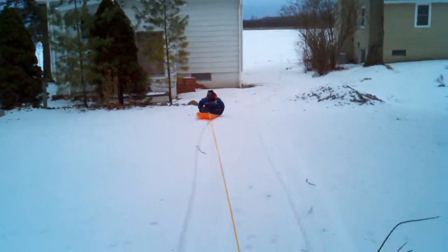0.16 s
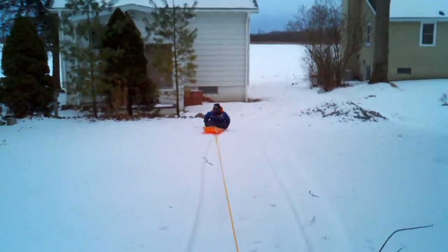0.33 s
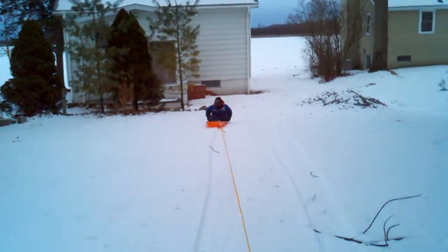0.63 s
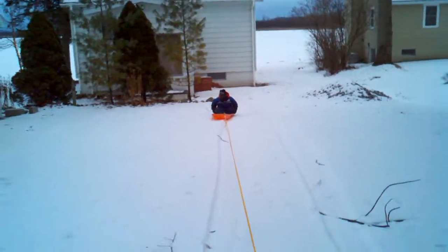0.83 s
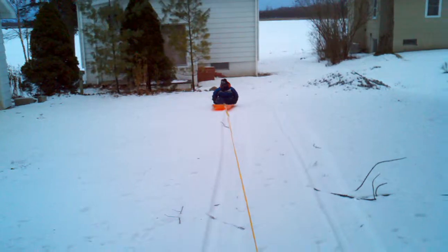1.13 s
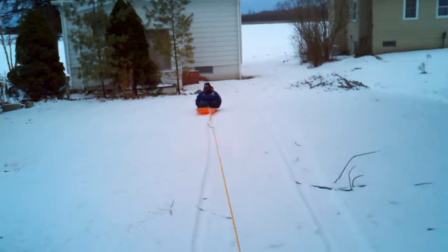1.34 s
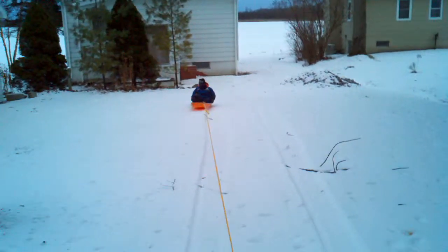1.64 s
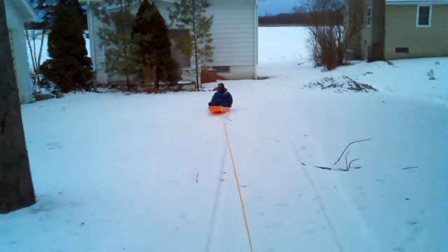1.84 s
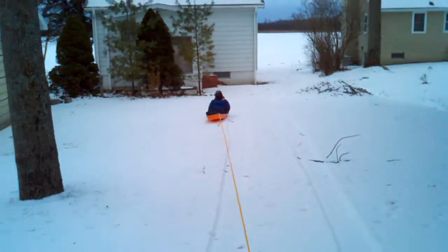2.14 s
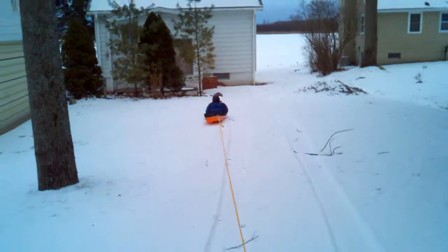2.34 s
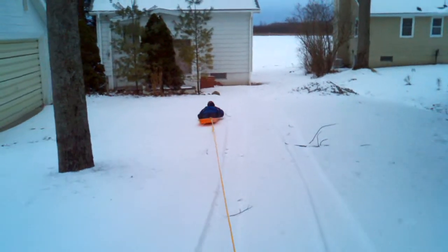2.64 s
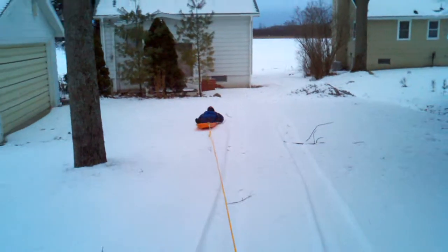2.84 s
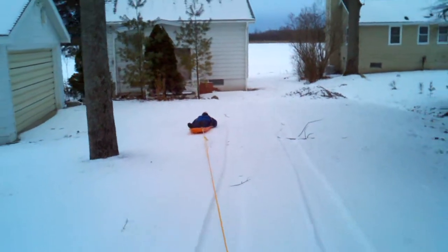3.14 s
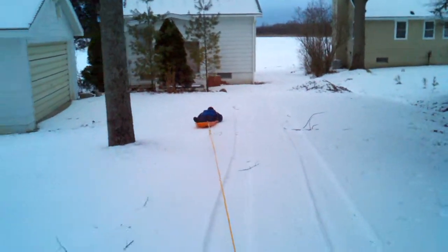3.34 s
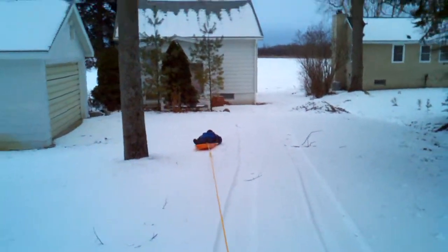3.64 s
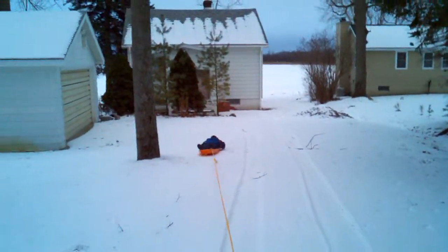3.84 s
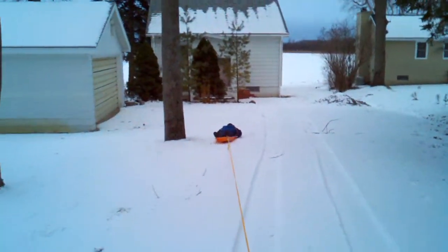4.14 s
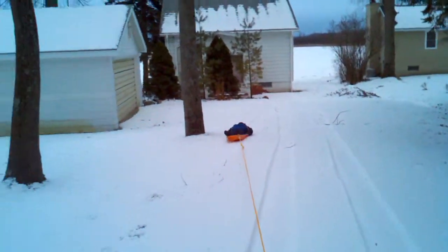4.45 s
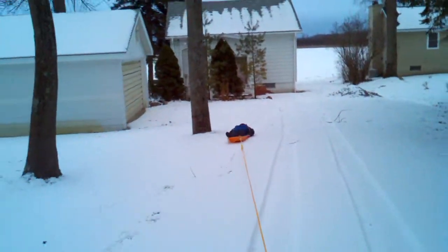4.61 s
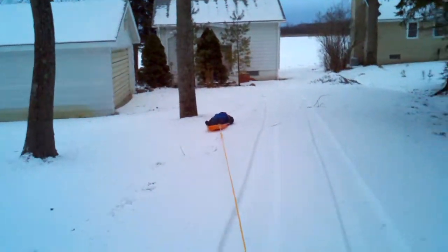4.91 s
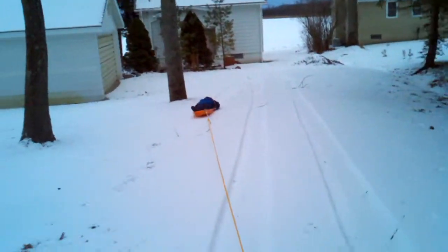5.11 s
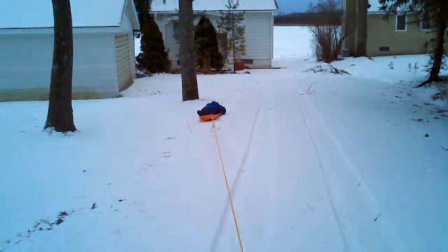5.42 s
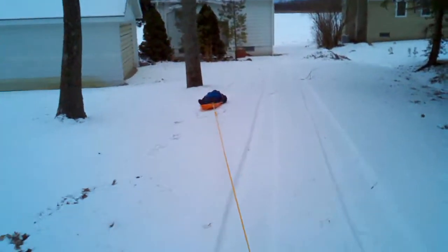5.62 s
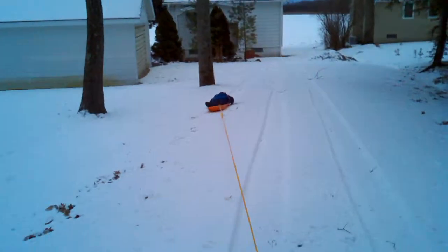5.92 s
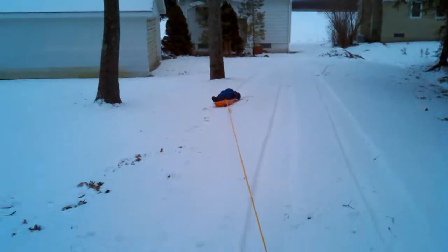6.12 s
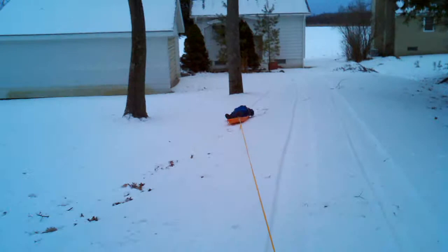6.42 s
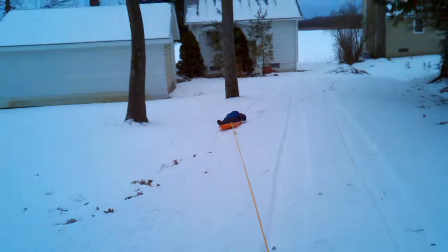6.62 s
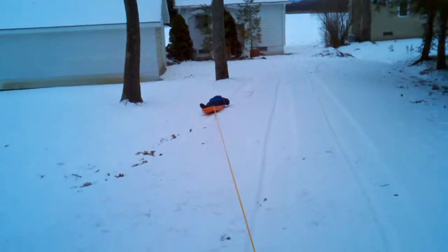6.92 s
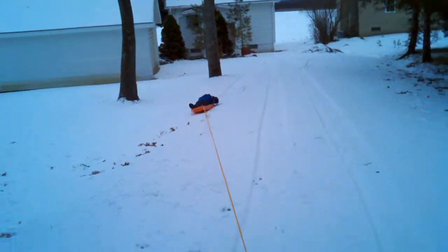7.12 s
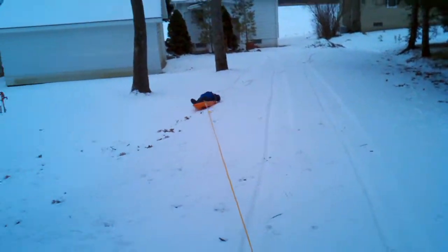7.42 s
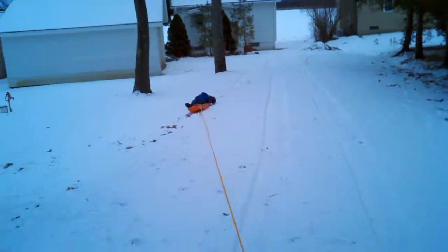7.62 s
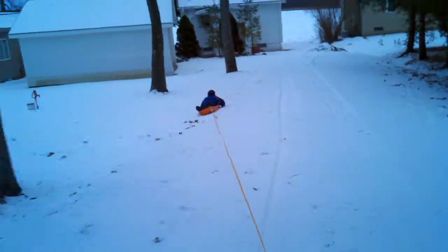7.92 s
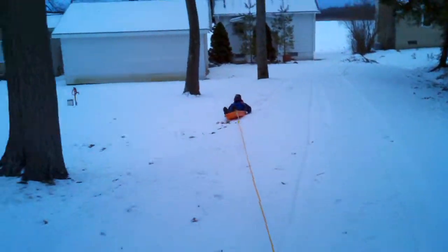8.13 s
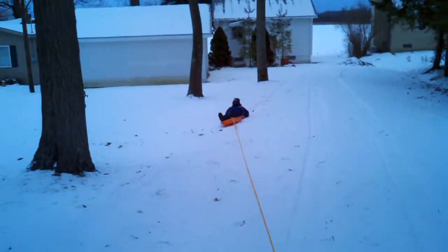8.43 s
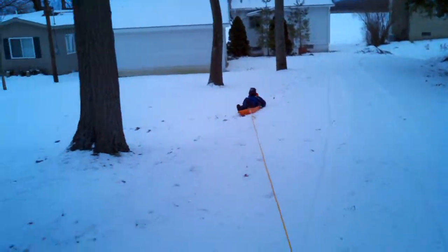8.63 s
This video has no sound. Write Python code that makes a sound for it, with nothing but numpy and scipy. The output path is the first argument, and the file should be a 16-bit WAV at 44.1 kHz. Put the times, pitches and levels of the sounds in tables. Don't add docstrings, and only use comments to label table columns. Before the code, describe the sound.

A nearby one-cylinder engine chugs with a hollow, buzzy exhaust, pulling a sled across a snowy yard. Its pitch drops briefly, climbs quickly, sinks again and then wavers gently. Mechanical clatter keeps step with the firings over a bright snowy hiss. Early bumps rattle the cart, and low gusts flap at the wide stereo microphone until about five seconds, when the air calms.

```python
import sys
import numpy as np
from scipy import signal
from scipy.fft import rfft, irfft, next_fast_len
from scipy.io import wavfile

SR = 44100
rng = np.random.default_rng(int(sys.argv[2]) if len(sys.argv) > 2 else 0)


def log_audio(samples):
    frames = np.atleast_2d(samples).T
    limited = np.clip(frames, -1, 1)
    pcm = np.round(limited * 32767).astype(np.int16)
    wavfile.write(sys.argv[1], SR, pcm)


N = 386316

# (t/s, rate/firings per s)
ENGINE_SPEED = [(0.0, 15.929), (0.432, 14.538), (0.635, 15.398), (1.59, 23.177), (1.972, 24.6),
                (2.322, 24.961), (2.732, 24.18), (3.71, 20.553), (4.703, 19.519), (5.046, 19.748),
                (5.223, 19.282), (5.504, 20.067), (5.786, 20.082), (5.922, 20.883), (6.645, 21.954),
                (7.12, 21.979), (8.034, 19.877), (8.76, 20.446)]
# (t/s, throttle/dB, snow/dB)
LOAD = [(0, -1.5, -2.5), (.3, 0, 1), (.75, -0.5, -2.5), (1.0, 2, 0), (1.5, 1, 0), (1.8, -2, 2.5),
        (2.4, -1.5, 0.5), (3.3, -2.5, -1.5), (3.5, 0, -0.5), (4.3, -0.5, 0.2), (5.2, 2, 0.5),
        (6.0, -0.5, -1.5), (6.8, 1, -0.2), (7.4, 1, -0.5), (8.0, 0, 0.1), (8.25, -0.5, 0), (8.76, 0, -0.5)]
# (t/s, spread/s, lag/hundredths of a cycle)
TUGS = [(.35, .28, -2.3), (.85, .08, 2), (1.29, .1, .8), (1.86, .3, .55), (2.74, .1, -2.21),
        (2.8, .16, 2.37), (3.07, .08, 1.88), (3.16, .25, -1.48), (3.68, .12, .5), (3.99, .08, -.97),
        (4.37, .09, .89), (5.13, .05, -.5), (5.33, .05, -.3), (5.45, .05, .3), (6.11, .06, -1.42),
        (6.31, .06, .55), (6.55, .1, -.44), (6.82, .08, -1.09), (7.29, .09, -2.59), (7.69, .3, 2.36),
        (7.73, .17, -3.07), (8.11, .06, -1.69), (8.39, .09, 1.54), (8.55, .18, -1.59)]
# (t/s, rattle/dB, crunch/dB)
BURSTS = [(0.02, 6, 1), (0.378, 5.5, 4.5), (0.44, 3, 5.5), (0.465, -2, -1), (0.515, -1.5, 1),
          (0.582, -1.5, 3), (0.65, -2, 6), (0.71, -1.5, 5), (0.775, 0, 2.5), (0.83, 2, 3), (0.89, 3, 3.5),
          (0.95, 3.5, 3), (1.0, 3.5, 3.5), (1.05, -0.5, 1.5), (1.11, -1.5, 3), (1.19, -1, 6),
          (1.67, 0.5, 0.5), (1.76, -0.5, 4.5), (2.04, 2, 0), (5.73, 1.5, 4.5), (7.3, 2, -2), (8.24, -1, 2)]
# (t/s, half length/s, peak/dB)
GUSTS = [(0.023, 0.15, -36), (0.5, 0.11, -27.5), (0.687, 0.061, -38), (0.998, 0.11, -33.5),
         (1.117, 0.11, -30), (1.82, 0.079, -29), (2.3, .12, -33), (2.553, 0.1, -33), (2.8, .1, -35),
         (3.0, 0.1, -29), (3.278, 0.2, -30.5), (3.486, .12, -29.5), (3.693, .1, -31), (3.898, .08, -34),
         (4.2, .08, -36), (4.5, 0.34, -35.5), (7.95, .15, -57)]
# (t/s, peak/dB, left-right/dB)
BUFFETS = [(0.043, -10, -3), (0.152, -19, 6), (0.459, -15, -13.5), (0.49, -24, -4), (0.507, -22, -3),
           (0.545, -12, -1), (0.694, -21, -6), (1.128, -20, 4), (1.355, -14.5, 16.5), (1.744, -13, 2),
           (1.813, -13, -1), (1.865, -18.5, -18), (1.885, -24, 9), (2.36, -12.5, 9), (2.517, -9, -8),
           (2.563, -14.5, -15), (2.587, -12, -9), (2.838, -24, -3), (2.899, -18, 6), (3.016, -7, -3),
           (3.189, -25, -12), (3.314, -17, -6), (3.441, -9.5, 8), (3.467, -14, -5), (3.661, -20, 4),
           (4.018, -15, 1), (4.16, -19, 7), (4.55, -22, 2), (4.584, -15, -4), (4.742, -24, -8)]
# (f/Hz, level/dB per Hz, left-right likeness, left-right/dB,
# throb/dB, loudest at/share of cycle)
HISS = [(3650, -17, 0.47, 0, .3, 0.82), (5200, -2, 0.59, 0.38, 0.26, 0.97), (6260, -1, 0.092, 0, 1.3, 0.99),
        (7820, 7, 0.091, 0, 0.65, 0.63), (9140, 0.5, 0.12, 1.1, 0.59, 0.89), (11140, 1, 0.06, 0, 1.3, 0.71),
        (12600, -5.5, 0.092, 0, 1.2, .75), (14150, 4.5, 0.11, 0, 1.2, .75)]
CLATTER = [(21.75, -43, -.5, -5, -3, .1), (59.6, -35, 0.64, 0, 5, .1), (113.9, -15, 0.91, -2, 8.5, 0.81),
           (211, -8, 0.98, 3.5, 1.5, 0.95), (279, -15, 1, 0.5, 1, 0.95), (420, -8, 0.81, 1.5, 2, .95),
           (704, -21, 0.64, 0.5, 3, 0.82), (1303, -27.5, 0.26, -1.5, 0.7, 0.73),
           (2015, -28, -0.27, 0.5, 2, 0.75), (2807, -48.5, -2.2, 18.5, 0.5, 0.49),
           (3338, -31, 0.3, -18, 1.5, 0.86), (4920, -61.5, 0.72, 2, -4, 0.5)]
# (f/Hz, width/Hz, level/dB, throb/dB, loudest at/share of cycle)
RINGS = [(2975, 190, -66, 0.5, 0.63), (3010, 41, -103, -14, 0.61), (2100, 460, -58, 1.5, 0.32),
         (10230, 810, -57.5, 3, 0.8)]
# (t/s, peak/dB)
KNOCKS = [(.458, -17), (1.453, -20), (2.555, -22), (2.585, -19), (3.015, -21), (3.442, -21), (3.465, -26),
          (4.617, -27), (6.77, -24), (7.18, -25), (7.31, -23)]
# (f/Hz, time to fall 60 dB/s, level/dB)
HITCH_TONES = [(330, .04, 0), (410, .035, -1), (490, .03, -3)]
# (engine order, level/dB)
GEARS = [(28, -52), (30, -55), (32, -53), (34, -58), (36, -55), (38, -55), (40, -57)]
# (f/Hz, time to fall 60 dB/s, left/dB, right/dB)
PANELS = [(554, 0.032, -20, -12), (667, 0.03, 9, 15.5), (807, 0.043, 18, 0), (897, 0.14, -15, 9)]
# (engine order, level/dB)
PULSE = [(4, -9), (5, -7), (6, 7.5), (8, .5), (9, 7.5), (10, 5), (11, -8.5), (12, 0.3)]
# (f/Hz, width/Hz, signed strength of exhaust pulse, of intake pulse)
PIPE = [(100.89, 17.8, 19, 25), (166.7, 44, 6, 7.5), (185.8, 13.7, -8.5, -19.5), (218.9, 18.9, -6.5, -13),
        (240.3, 16, -12.5, 2), (335.4, 20, 12.5, 7.15), (415.6, 15.95, -1.5, -5), (435.07, 34.4, -8, -2),
        (479.7, 28.4, -3.5, -7), (509.38, 40, 1.1, 4.5), (684, 51, -2, -0.5), (702, 104, 1.1, -0.76),
        (920, 15, 0.9, -0.3), (1110, 110, -0.6, 0.84)]
# (f/Hz, left-right/dB, left leads by/radians)
PORTS = [(80, 0.5, 0.6), (124, 0, 0.24), (164, 3, 0.54), (194, 4.5, 0.8), (214, 3.5, 0.2), (281, -16.5, 2),
         (317, 0, 0.52), (503, -1.5, -0.4)]
# (f/Hz, share of the other side taken off)
WIDEN = [(30, 0.35), (250, 0.21), (850, 0.37), (1200, .97), (2600, .95), (4000, .97), (5200, .7),
         (6500, 0.42), (14000, 0.38)]

CYCLE_AT_START = .93
MEAN_RATE = 21
CURVE_STEP = 64
EXHAUST_DB, EXHAUST_DB_PER_RATE, BARK_DB_PER_OCTAVE = -58.5, 0.58, 2.0
CLATTER_DB, CLATTER_DB_PER_RATE, CLATTER_FOLLOWS = -39.5, 0.68, 0.37
HISS_DB, RING_DB, RING_FOLLOWS, GEAR_DB_PER_RATE = -53.5, 3, 1, 0.48
BREEZE_DB, LEE_DB, LEE_FROM_S, GUST_FALL_DB = -43, -51, 5, 6
BURST_S = 0.014
EXHAUST_AT, INTAKE_AT = -.107, .185
BASS_CUT_HZ = 130.2
CRANK_DB, CRANK_FROM_ORDER = 4, 25
IDLE_JITTER, IDLE_BELOW_RATE = .0015, 19
IDLE_PULSE_DB, IDLE_RATE, PULL_RATE = 7.5, 16.2, 20.6


def from_db(db):
    return 10 ** (np.asarray(db) / 20)


def rms_one(x):
    return x / np.sqrt(np.mean(x ** 2) + 1e-20)


def in_time(rows):
    s, *columns = np.transpose(rows)
    return [np.interp(np.arange(N) / SR, s, column) for column in columns]


def from_coarse(values):
    return np.interp(np.arange(N), np.arange(0, N, CURVE_STEP), values)


def bells(s, spread_s):
    coarse_s = np.arange(0, N, CURVE_STEP) / SR
    return np.exp(-.5 * ((coarse_s - s[:, None]) / spread_s) ** 2)


def band(x, low_hz, high_hz, order=2):
    return signal.sosfilt(signal.butter(order, [low_hz, high_hz], "band", fs=SR, output="sos"), x)


def drift(rate):
    r = np.exp(-80 * np.pi * rate / SR)
    noise = rng.standard_normal(N // 40 + 2002)
    slow = signal.lfilter([1], [1, -2 * r, r * r], noise)[2000:]
    return np.interp(np.arange(N) / 40, np.arange(len(slow)), rms_one(slow))


def ring(clicks, hz, t60):
    r = from_db(-60 / (t60 * SR))
    w = 2 * np.pi * hz / SR
    return signal.lfilter([0, np.sin(w)], [1, -2 * r * np.cos(w), r * r], clicks + 1e-18)


def throb(cycle, depth_db, loudest):
    return from_db(depth_db * np.cos(2 * np.pi * (cycle - loudest)))


def cycle_noise(table, cycle, patchy_db, count):
    hz, *columns = np.transpose(table)
    edges = np.geomspace(table[0][0], table[-1][0], count + 1)
    together = drift(15.0)
    white = rng.standard_normal((2, 2, N))
    out = 0
    for k, (low, high) in enumerate(zip(edges, edges[1:])):
        centre = np.log(low * high) / 2
        level, alike, pan, depth, loudest = [np.interp(centre, np.log(hz), c) for c in columns]
        alike = np.clip(alike, -1, 1)
        mid, side = band(white[k % 2], low, high)
        pair = np.sqrt(1 + alike) * mid + np.sqrt(1 - alike) * side * [[1], [-1]]
        patchy = patchy_db * (0.69 * together + drift(3.7))
        gain = from_db(level + patchy) * throb(cycle, depth, loudest)
        out = out + gain * pair * from_db([[pan / 2], [-pan / 2]])
    return rms_one(out)


def gustiness():
    t = np.arange(N) / SR
    level_db = np.interp(t, [LEE_FROM_S - .1, LEE_FROM_S + .1], [BREEZE_DB, LEE_DB])
    for s, half_s, peak_db in GUSTS:
        level_db = np.maximum(level_db, peak_db - GUST_FALL_DB * np.abs(t - s) / half_s)
    return level_db


def buffets():
    clicks = np.zeros((2, N))
    chance = rng.standard_normal((len(BUFFETS), 3))
    for (s, peak_db, pan_db), draw in zip(BUFFETS, chance):
        at = int(s * SR) - 150 + np.array([0, 130, 290])
        side_db = 0.74 * pan_db * np.array([[1], [-1]])
        clicks[:, at] += from_db(peak_db + 34.5 + side_db) * (draw / 4 + [-.7, 1, -.4])
    return band(band(clicks, 155, 350), 56, 440) * [[1], [-1]]


def wind():
    lumps = rng.standard_normal((2, N)) * from_db([3.5 * drift(21), 2.5 * drift(25)])
    low = rms_one(band(band(lumps, 85, 249), 55, 295))
    opposed = low[0] * [[1], [-1]]
    shared = 0.31 * band(low[1], 108, 410)
    return from_db(gustiness() + 4.0) * (opposed + shared) + buffets()


def bursts():
    s, *swell_db = np.transpose(BURSTS)
    humps = bells(s, BURST_S)
    return [from_coarse(db @ humps) for db in swell_db]


def snow_hiss(cycle, hiss_db):
    noise = cycle_noise(HISS, cycle, patchy_db=1.43, count=10)
    return from_db(HISS_DB + hiss_db + 3.5) * noise


def shroud_rings(cycle, hiss_db):
    out = 0
    for hz, width, level_db, depth_db, loudest in RINGS:
        noise = rms_one(band(rng.standard_normal((2, N)), hz - width / 2, hz + width / 2))
        gain = from_db(level_db + 2.27 * drift(7.0)) * throb(cycle, depth_db, loudest)
        out = out + gain * noise
    return from_db(RING_DB + RING_FOLLOWS * hiss_db) * out


def hitch():
    s, peak_db = np.transpose(KNOCKS)
    clicks = np.zeros(N)
    clicks[(s * SR).astype(int)] = from_db(peak_db - 6)
    tones = sum(from_db(level_db) * ring(clicks, hz, t60) for hz, t60, level_db in HITCH_TONES)
    return band(tones, 204, 700)


def gears(cycle, rate):
    out = 0
    for order, level_db in GEARS:
        speed_db = GEAR_DB_PER_RATE * (rate - MEAN_RATE)
        gain = from_db(level_db + 2 + speed_db + 2.5 * drift(2))
        out = out + gain * np.sin(2 * np.pi * (order * cycle + rng.random()))
    return out


def clatter(cycle, clatter_db):
    return from_db(clatter_db + 6.5) * cycle_noise(CLATTER, cycle, patchy_db=0.88, count=18)


def panels(cycle, clatter_db):
    out = np.zeros((2, N))
    for share, knock_db in [(0.018, 0.87), (-.28, 10.4)]:
        at = np.flatnonzero(np.diff(np.floor(cycle + share)) > 0)
        chance = rng.standard_normal((len(at), len(PANELS)))
        for k, (hz, t60, left_db, right_db) in enumerate(PANELS):
            clicks = np.zeros(N)
            clicks[at] = from_db(knock_db + 1.2 * chance[:, k])
            out += ring(clicks, hz, t60) * from_db([[left_db], [right_db]])
    return from_db(clatter_db - 12.5) * rms_one(band(out, 650, 1240))


def tugs():
    s, spread_s, lag = np.transpose(TUGS)
    return from_coarse(lag / 100 @ bells(s, spread_s[:, None]))


def pulse_level(order, hz):
    pull = np.clip((hz / order - IDLE_RATE) / (PULL_RATE - IDLE_RATE), 0, 1)
    idle_db = IDLE_PULSE_DB * np.clip((14 - order) / 2, 0, 1) * np.clip((order - 6) / 3, 0, 1)
    crank_db = CRANK_DB * np.cos(np.pi * order) * (order > CRANK_FROM_ORDER)
    return pull * np.interp(order, *np.transpose(PULSE)) + (1 - pull) * idle_db + crank_db


def pipe(order, hz):
    pulses = np.exp(-2j * np.pi * order * np.array([EXHAUST_AT, INTAKE_AT]))
    modes = 0
    for centre, width, *strength in PIPE:
        damping = 1j * hz * width
        modes = modes + damping / (centre ** 2 - hz ** 2 + damping) * (pulses @ strength)
    cut = 1j * hz / BASS_CUT_HZ
    bass_cut = (cut ** 2 / (1 + 1.085 * cut + cut ** 2)) ** 2
    return modes * bass_cut * from_db(pulse_level(order, hz))


def exhaust(cycle, rate, throttle_db):
    ports = np.transpose(PORTS)
    coarse = np.arange(0, N, CURVE_STEP)
    speed = rate[coarse]
    side = np.array([[.5], [-.5]])
    jitter = .0007 + IDLE_JITTER * np.maximum(IDLE_BELOW_RATE - rate, 0)
    uneven = jitter * drift(7.3)
    out = np.zeros((2, N))
    for order in range(3, 46):
        hz = order * speed
        pan, lead = [np.interp(np.log(hz), np.log(ports[0]), c) for c in ports[1:]]
        bark = np.clip(0.43 + BARK_DB_PER_OCTAVE * np.log2(hz / 200), 0, 1.5)
        level_db = EXHAUST_DB_PER_RATE * (speed - MEAN_RATE) + throttle_db[coarse] * bark
        gain = from_db(level_db + 1.17 * drift(8.4)[coarse] + side * pan)
        turn = pipe(order, hz) * gain * np.exp(1j * side * lead)
        carrier = np.exp(2j * np.pi * order * (cycle + uneven))
        for ear in range(2):
            out[ear] += (from_coarse(turn[ear]) * carrier).real
    return from_db(EXHAUST_DB) * out


def scene():
    rate, = in_time(ENGINE_SPEED)
    cycle = CYCLE_AT_START + np.cumsum(rate) / SR - tugs()
    throttle_db, snow_db = in_time(LOAD)
    rattle_db, crunch_db = bursts()
    hiss_db = snow_db + crunch_db
    speed_db = CLATTER_DB_PER_RATE * (rate - MEAN_RATE)
    clatter_db = CLATTER_DB + speed_db + CLATTER_FOLLOWS * throttle_db + rattle_db
    background = wind() + snow_hiss(cycle, hiss_db) + shroud_rings(cycle, hiss_db) + hitch()
    machinery = gears(cycle, rate) + clatter(cycle, clatter_db) + panels(cycle, clatter_db)
    return background + machinery + exhaust(cycle, rate, throttle_db)


def low_pass(x):
    return signal.sosfilt(signal.butter(12, 14130, fs=SR, output="sos"), x)


def record(dry):
    size = next_fast_len(N + 4096)
    hz = np.fft.rfftfreq(size, 1 / SR)
    widen_hz, widen_share = np.transpose(WIDEN)
    share = np.interp(np.log(hz + 1), np.log(widen_hz), np.clip(widen_share, 0, 1))
    delay = np.exp(-2j * np.pi * hz * 17 / SR)
    late = irfft(rfft(dry[::-1], size) * share * delay, size)[:, :N]
    limited = .6 * np.tanh((dry - late) / .6)
    top_cut = signal.ellip(10, .3, 45, 14020, fs=SR, output="sos")
    return low_pass(signal.sosfilt(top_cut, limited))


dry = scene()
out = record(dry)
log_audio(out)
```